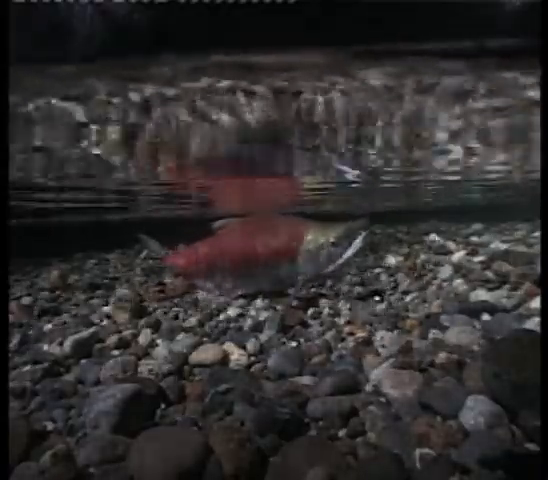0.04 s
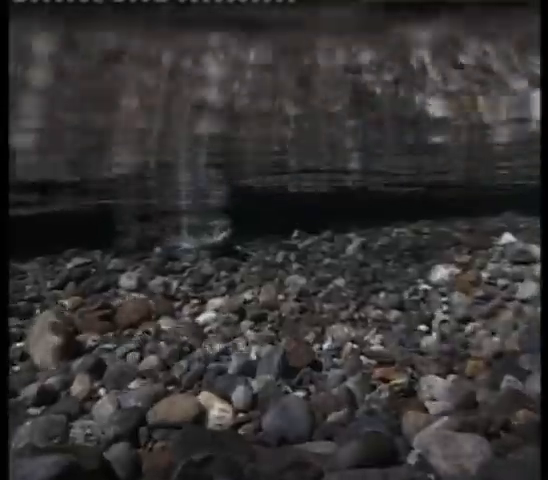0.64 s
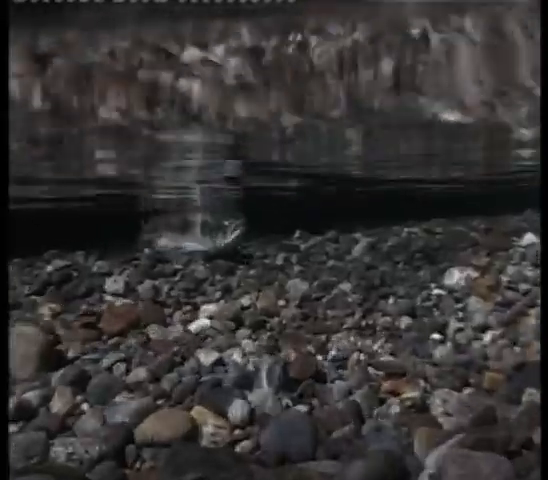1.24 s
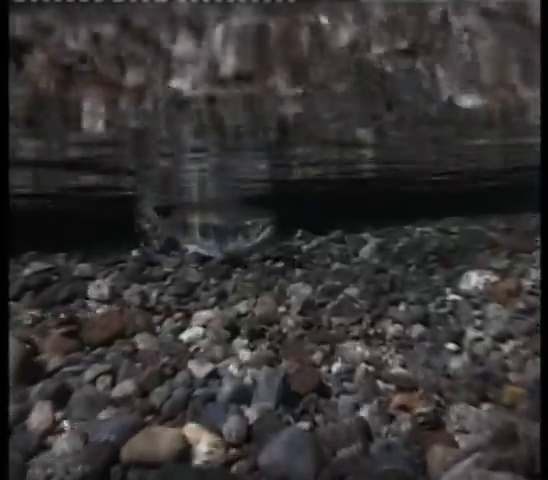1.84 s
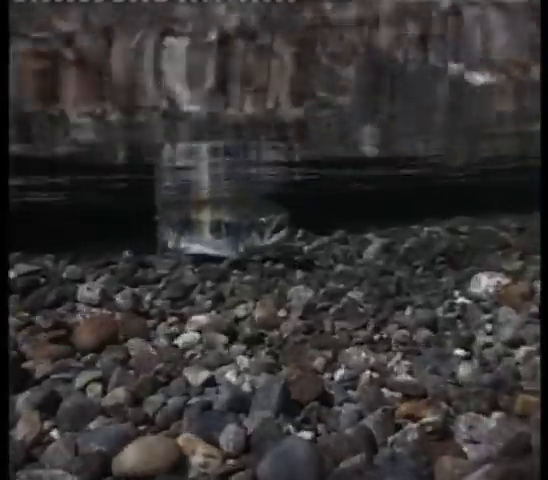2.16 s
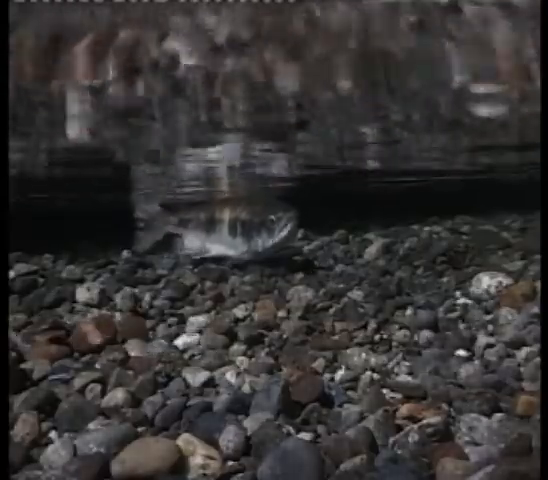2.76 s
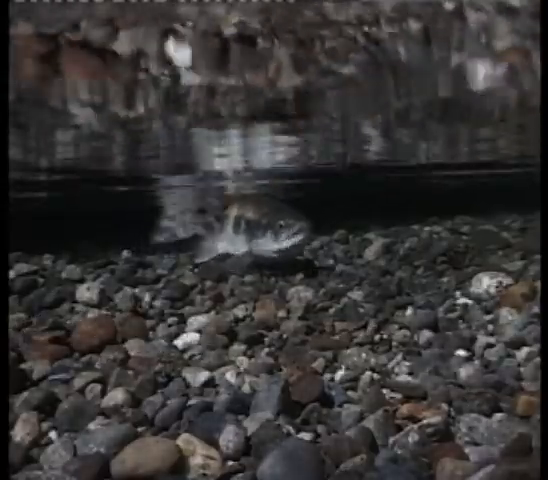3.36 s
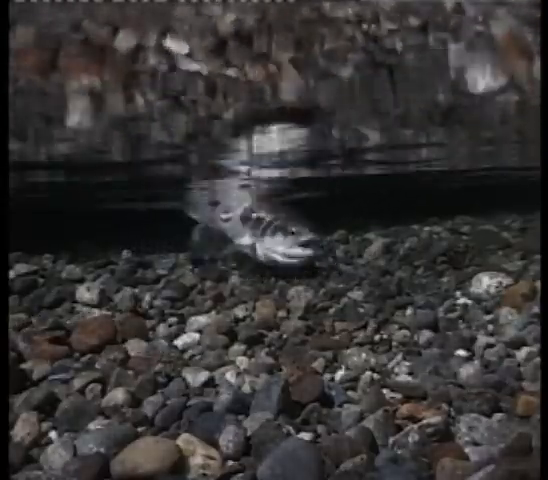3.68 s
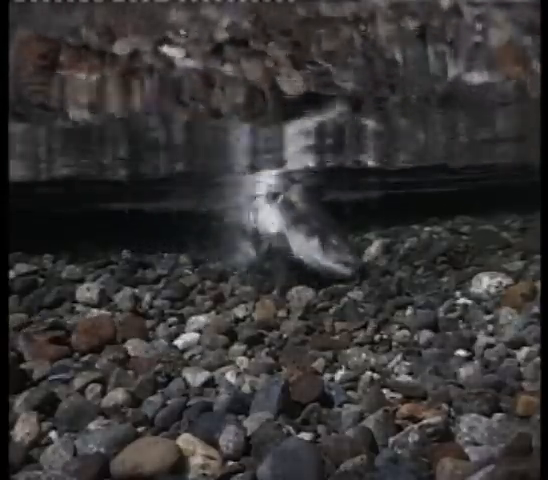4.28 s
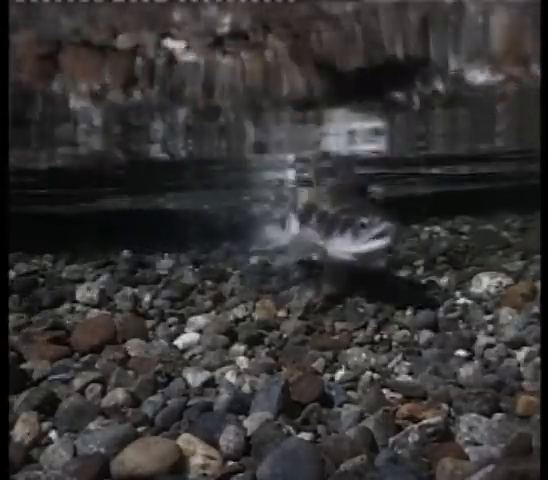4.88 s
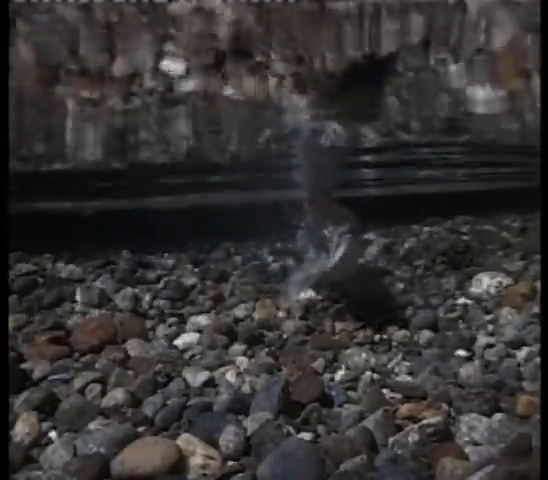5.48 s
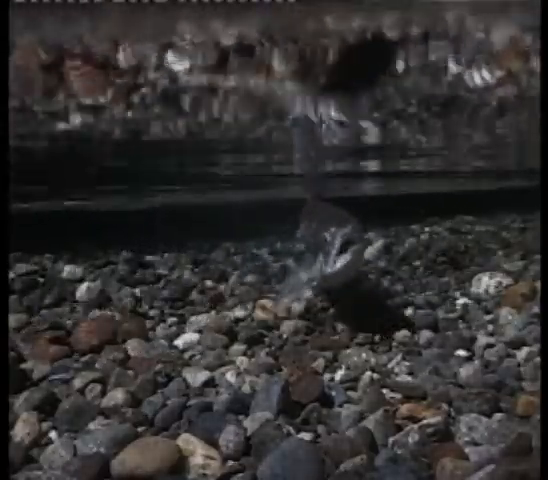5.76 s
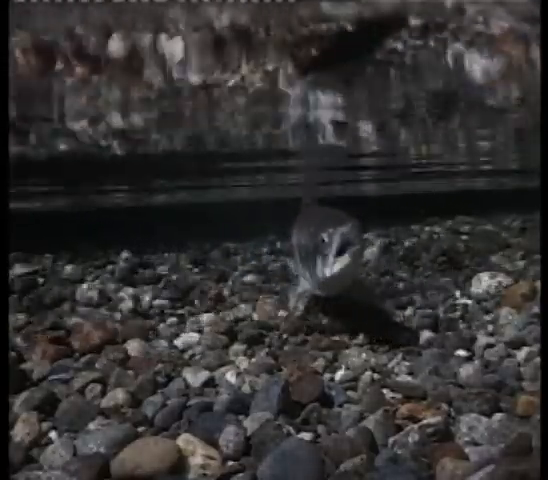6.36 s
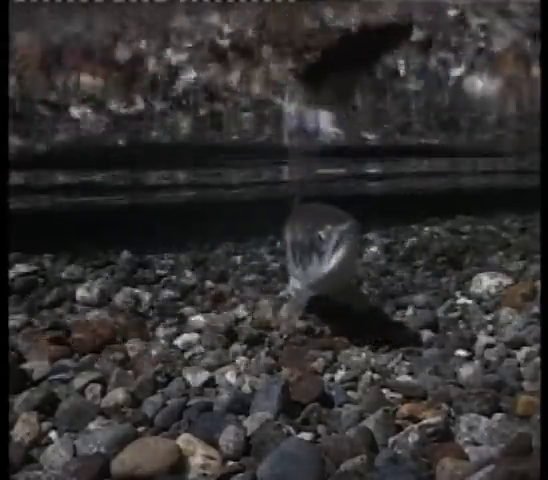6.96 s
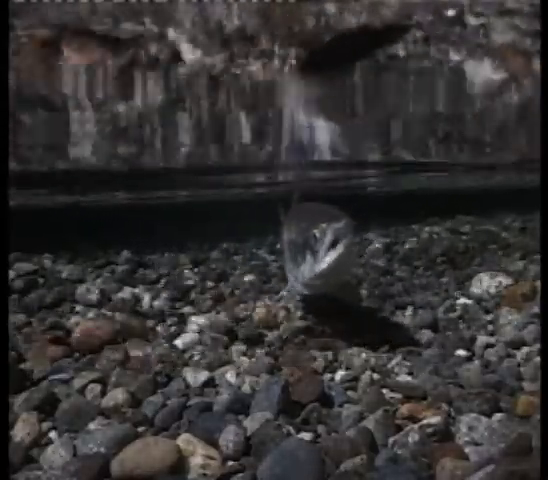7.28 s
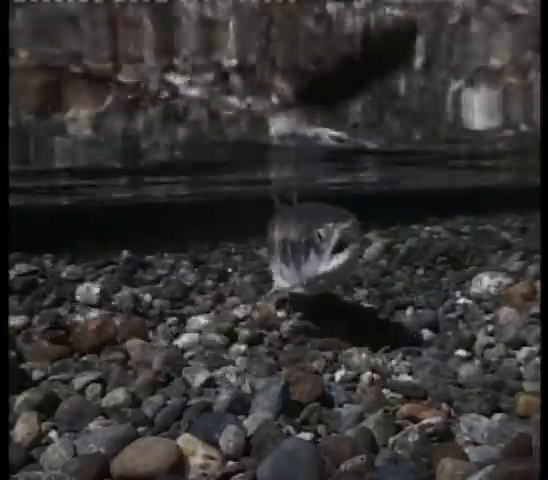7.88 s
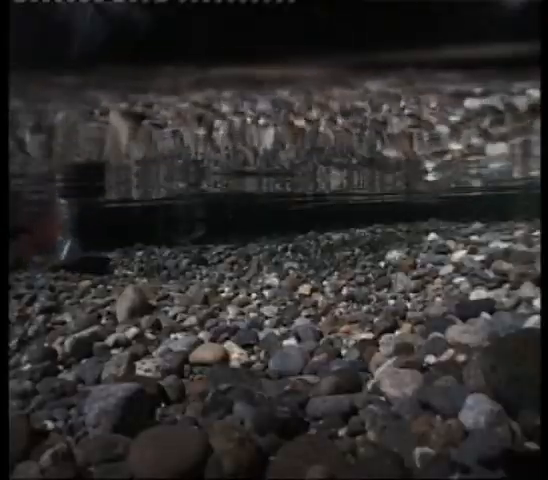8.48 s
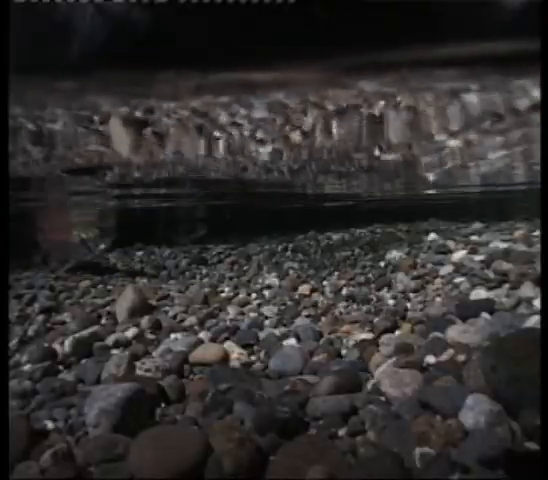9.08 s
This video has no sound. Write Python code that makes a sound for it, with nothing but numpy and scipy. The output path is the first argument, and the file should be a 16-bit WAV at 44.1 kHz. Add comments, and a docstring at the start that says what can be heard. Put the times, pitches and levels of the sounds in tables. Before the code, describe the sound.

At about 0.1 seconds a harsh digital glitch crackles, by far the loudest sound, and the signal goes dead until 0.3 seconds. A quiet, steady electrical buzz with a thin whistle and hiss then runs to the end, heard through two underwater microphones, the left much louder. A low, wavering hum joins from about 0.5 to 2.3 seconds. Between 1 and 2 seconds a fish lightly flicks its tail over gravel, with trickling grit and a few small pebble knocks. After a pause, from about 3.7 to 5.1 seconds, firm strokes come at roughly seven a second, rattling pebbles and rolling stones, with soft thumps and gulps of water. Bright knocks and clinks stand out, strongest around 4.5 seconds. The gravel settles with a last small knock near 5.6 seconds, leaving only buzz, whistle and hiss until about 9 seconds.

```python
"""Underwater over a gravel bed, through two microphones, the left much louder. A salmon beats its tail:
light flicks brush the grit, then firm strokes rattle pebbles, roll stones and push soft thumps of water
at the microphones. Single pebbles knock and clink. Behind the fish sit a steady electrical buzz, a
whistle and hiss, with a low hum in the first seconds. Just after the start a digital glitch crackles
loudly and the signal drops out for a moment."""
import sys
import numpy as np
from scipy import signal
from scipy.fft import rfft, irfft
from scipy.io import wavfile
from scipy.ndimage import uniform_filter1d

SR = 44100
rng = np.random.default_rng(int(sys.argv[2]) if len(sys.argv) > 2 else 0)


def put_to_file(sound):
    """Save the sound as 16-bit audio at rate SR, in the file named by the first command-line argument."""
    columns = np.atleast_2d(sound).T  # one column per channel
    safe = np.clip(columns, -1, 1)
    whole_steps = np.round(safe * 32767)
    wavfile.write(sys.argv[1], SR, whole_steps.astype(np.int16))


N = 402633
TIME = np.arange(N) / SR
FREQ = np.maximum(np.arange(N // 2 + 1) * SR / N, 1)

# Tail strokes digging into the bed, about seven a second: full_s, level_db
TAIL_STROKES = [(3.745, -70), (3.91, -63), (4.05, -60.5), (4.19, -58), (4.325, -59.5), (4.455, -54.5),
                (4.685, -55), (4.805, -58.5), (5.02, -64)]
FIRM_STROKE_DB, STROKE_HOLD_S = -55.5, 0.018


def digging(attack_s=0.053, slide_db=-5, stone_growth=1.16):
    """Each stroke rattles pebbles, leaves the bed sliding and rolls larger stones, which ring lower."""
    pebbles = level(shallows(contacts(per_s=1700, spread_db=5.5), decay_s=0.0022), 0.92)
    stones = shallows(contacts(per_s=600, spread_db=4.5), decay_s=0.0026)
    stones = level(colour(stones, [(2000, -3), (3200, 4), (4500, -17), (7000, -31)]), -57)
    push = beats(TAIL_STROKES, attack_s, STROKE_HOLD_S, release_s=0.047)
    slide = beats(TAIL_STROKES, attack_s, STROKE_HOLD_S, release_s=0.24)
    roll = beats(TAIL_STROKES, attack_s, STROKE_HOLD_S, release_s=0.12)
    rattling = pebbles * np.hypot(push, undb(slide_db) * slide)
    rolling = stones * (roll / undb(FIRM_STROKE_DB)) ** stone_growth
    return pan(rattling + rolling, left_db=4.5)


# Light flicks of the tail, just brushing the bed: full_s, level_db
TAIL_FLICKS = [(0.995, -65), (1.255, -59.5), (1.4, -62.5), (1.565, -58.5), (1.69, -63)]


def brushing():
    """Light flicks shift only fine grit, which keeps trickling while the fish hovers."""
    grit = shallows(contacts(per_s=900, spread_db=4.5), decay_s=0.00088)
    grit = level(colour(grit, [(2500, -12.5), (6000, -12), (8000, -9), (12000, -5)]), -1)
    flicks = beats(TAIL_FLICKS, attack_s=0.02, hold_s=0.015, release_s=0.045)
    trickle = undb(-74) * envelope(full_s=0.7, attack_s=0.15, hold_s=1.4, release_s=0.15)
    return pan(grit * np.hypot(flicks, trickle), left_db=5.5)


def contacts(per_s, spread_db):
    """Gravel touching gravel: dense tiny impacts, mostly small and a few large."""
    hits = rng.random(N) < per_s / SR
    signs = rng.choice([-1, 1], N)
    sizes = undb(spread_db * np.minimum(rng.exponential(size=N), 4))
    return level(hits * signs * sizes, 0)


# Ring of the gravel at the left and right microphones: pitch_hz, width_hz, gain_db
LEFT_MIC_MODES = [(2420, 180, 1), (2970, 230, -0.5), (3520, 280, 0), (4340, 350, -1), (5200, 330, 2),
                  (5900, 610, 1), (6140, 200, 7.5), (7800, 570, 0.5), (8200, 330, -5), (9000, 300, -8),
                  (9800, 360, -1), (11970, 2000, -2)]
RIGHT_MIC_MODES = [(2980, 390, -6), (3450, 600, -5.5), (4490, 900, -3), (5570, 400, 7.5), (7400, 900, -5),
                   (10550, 1900, -4.5), (11400, 500, -40)]


def shallows(force, decay_s):
    """Echoes between bed and surface smear each contact, which rings differently at each microphone."""
    energy = signal.lfilter([1], [1, -np.exp(-2 / (decay_s * SR))], force ** 2 + 1e-18)
    echoes = np.sqrt(energy) * rng.standard_normal((2, N))
    power = [sum(undb(2 * db) / (1 + 2 * ((FREQ - hz) / width) ** 2) ** 2 for hz, width, db in modes)
             for modes in (LEFT_MIC_MODES, RIGHT_MIC_MODES)]
    return irfft(rfft(echoes) * np.sqrt(power), N)


# Single pebbles knocking together, well to the left: start_s, strength_db
PEBBLE_KNOCKS = [(1.2221, -49), (1.3, -44.5), (1.5678, -47), (1.6866, -48), (1.709, -49), (2.0423, -47),
                 (3.7514, -43), (3.883, -42.5), (3.917, -49), (4.0125, -40.5), (4.0556, -41), (4.2043, -49),
                 (4.2646, -41), (4.3406, -35.5), (4.5392, -34.5), (4.7834, -34.5), (4.9062, -51),
                 (5.6047, -50)]
# Stones ringing as they settle, nearer the centre: start_s, pitch_hz, level_db
STONE_CLINKS = [(4.47, 5500, -48), (4.493, 5450, -45), (4.539, 9000, -44), (4.865, 8050, -57),
                (4.928, 3550, -53), (5.046, 3030, -48), (5.076, 6050, -55)]


def knocks(knock_gain_db=-4, knock_decay_s=0.002, clink_decay_s=0.003):
    """Larger pebbles meet with a short, bright chatter; a few settle with a clear clink."""
    force, clinks = np.zeros((2, N))
    t = TIME[:1024]
    attack = 1 - np.exp(-t / 0.0004)
    for start_s, db in PEBBLE_KNOCKS:
        add_at(force, start_s, undb(db + knock_gain_db) * attack * np.exp(-t / knock_decay_s))
    for start_s, hz, db in STONE_CLINKS:
        ringing = np.exp(-t / clink_decay_s) * np.sin(2 * np.pi * hz * t)
        add_at(clinks, start_s, undb(db) * attack * ringing)
    chatter = force * rng.standard_normal(N)
    chatter = colour(chatter, [(500, -18), (2500, 4), (6000, 1), (9000, 4.5), (12500, 2)])
    return pan(chatter, left_db=15) + pan(clinks, left_db=4)


# Soft knocks of water as the body turns: start_s, pitch_hz, level_db
WATER_GULPS = [(3.845, 417, -47.5), (3.875, 730, -56), (4.11, 466, -56), (4.39, 800, -50),
               (4.825, 764, -49)]


def wash(surge_db=-68.5, lead_s=0.034, growth=0.55):
    """Tail strokes push dull surges of water against the microphones, with a few soft gulps."""
    surge = ring(ring(rng.standard_normal(N), [(85, 53, 0)]), [(90, 75, 0)])
    # the water runs ahead of each stroke and grows with force more slowly than the rattle
    pushes = [(s - lead_s, surge_db + growth * (db - FIRM_STROKE_DB)) for s, db in TAIL_STROKES]
    flow = beats(pushes, attack_s=0.04, hold_s=STROKE_HOLD_S, release_s=0.05)
    gulps = np.zeros(N)
    t = TIME[:4096]
    for start_s, hz, db in WATER_GULPS:
        # a damped bubble of about four cycles, rising a little in pitch
        bubble = np.sin(2 * np.pi * hz * t * (1 + 2 * t)) * np.exp(-t * hz / 4)
        add_at(gulps, start_s, undb(db) * bubble)
    return pan(level(surge, 0) * flow + gulps, left_db=8)


# Spectrum of the fizz inside the glitch: frequency_hz, gain_db
FIZZ_SPECTRUM = [(30, -2), (120, -2.5), (280, -3), (700, 4.5), (1400, -5.5), (3200, 1.5), (9000, -1.5),
                 (13000, -6), (16000, -28.5)]


def glitch(start_s=0.099, end_s=0.134, spike_count=19, fizz_db=-20.5, hold_s=0.037, sag_db_per_s=91.5):
    """A harsh digital glitch: sharp spikes over a burst of fizz, different in each channel."""
    sag_db = sag_db_per_s * np.clip(TIME - start_s, 0, hold_s)
    burst = undb(fizz_db - sag_db) * envelope(start_s, attack_s=0.00035, hold_s=hold_s, release_s=0.0037)
    channels = []
    for _ in range(2):
        jitter, weakness, polarity = rng.random((3, spike_count))
        progress = (np.arange(spike_count) + jitter) / spike_count
        spike_db = np.interp((weakness + progress) / 2, [0.2, 0.9], [3.5, -5])  # early ones hit harder
        spikes = clicks(start_s + (end_s - start_s) * progress, np.sign(polarity - 0.5) * undb(spike_db))
        fizz = level(colour(rng.standard_normal(N), FIZZ_SPECTRUM), 0)
        channels.append(spikes + burst * fizz)
    return pan(np.array(channels), left_db=3)


# Irregular ticks within each buzz cycle: offset_ms, relative_db, until_s
CYCLE_TICKS = [(4.3, 0, 2.0), (5.4, 0, 2.0), (6.7, -6, 8), (9.05, -2, 9.2), (9.25, 0, 9.2), (10.2, -1, 9.2),
               (10.7, -2, 9.2), (11.7, -3, 9.2), (12.8, -5, 9.2), (13.2, -1, 9.2)]
# Spectra of the ticks and of their rasp: frequency_hz, gain_db
TICK_SPECTRUM = [(100, -14.5), (800, 2.5), (1500, 4), (2600, -6), (3250, -2.5), (4000, -2.5), (4800, -8),
                 (5650, -4), (6400, -4.5), (7300, -5.5), (8700, -10), (9650, -5), (10500, -11),
                 (13000, -11)]
RASP_SPECTRUM = [(300, -8), (1600, -1), (3300, -1), (5800, -5), (8000, -13), (13000, -15)]
BUZZ_HZ = 50.0015
BUZZ_PHASE = 2 * np.pi * BUZZ_HZ * (TIME - 0.0108)


def buzz(tick_rate_hz=805.5, tick_db=-64, rasp_db=-66.5, stray_gain_db=-1):
    """Electrical interference, mostly left: eight ticks a cycle plus strays, each with a spit of noise."""
    cycles = np.arange(int(N / SR * BUZZ_HZ) + 1) / BUZZ_HZ
    times = (cycles[:, None] + 0.00372 + np.arange(8) / tick_rate_hz).ravel()
    sizes = rng.uniform(1, 1.4, len(times))
    for offset_ms, db, until_s in CYCLE_TICKS:
        starts = cycles[cycles < until_s]
        times = np.append(times, starts + (offset_ms + rng.normal(0, 0.05, len(starts))) / 1000)
        sizes = np.append(sizes, undb(db + stray_gain_db) * rng.uniform(0.3, 1.4, len(starts)))
    # every tick swings down, then overshoots upward
    ticks = 0.7 * clicks(times + 0.00012, sizes) - clicks(times, sizes)
    spits = np.sqrt(np.abs(uniform_filter1d(ticks ** 2, size=36)))
    rasp = level(colour(spits * rng.standard_normal(N), RASP_SPECTRUM), rasp_db)
    return pan(level(colour(ticks, TICK_SPECTRUM), tick_db) + rasp, left_db=15.5)


# Harmonics in the ringing part of the buzz: harmonic_number, relative_db
TONE_HARMONICS = [(2, -18), (15, -46), (17, -43), (19, -4), (20, -1.5), (22, -14.5), (25, -33), (29, -17.5),
                  (32, -19)]
# Slow rise and fall of that ringing: time_s, strength_db
TONE_SWELL = [(0.35, -63.5), (1.08, -60), (2.23, -61), (2.25, -58.5), (4.42, -60.5), (6.54, -58.5),
              (8.07, -60), (8.2, -64.5), (9.1, -63)]


def buzz_tone(gain_db=-1):
    """High harmonics of the interference beat into a ringing tone that swells once a cycle."""
    tone = sum(undb(db) * np.sqrt(2) * np.cos(round(k) * BUZZ_PHASE) for k, db in TONE_HARMONICS)
    swell_db = np.interp(TIME, *np.transpose(TONE_SWELL))
    return pan(tone * undb(gain_db + swell_db), left_db=19)


def whine(whistle_hz=568.8, hum_hz=162, waver_hz=5):
    """A steady electrical whistle, and a wavering low hum with a rough octave in the first seconds."""
    whistle = level(np.sin(2 * np.pi * whistle_hz * TIME), -65.5)
    drift = level(uniform_filter1d(rng.standard_normal(N), size=2205), 0)
    hum = level(np.sin(2 * np.pi * np.cumsum(hum_hz + waver_hz * drift) / SR), -2.2)
    octave = level(ring(ring(rng.standard_normal(N), [(357, 130, 0)]), [(356, 150, 0)]), 2)
    swell = undb(-69.5) * envelope(full_s=0.6, attack_s=0.5, hold_s=1.68, release_s=0.1)
    return pan(whistle, left_db=17) + pan((hum + octave) * swell, left_db=8)


# Noise floor at both microphones: frequency_hz, gain_db
HISS_SPECTRUM = [(15, -21), (45, -4), (90, -5), (170, -5.5), (260, -5.5), (390, 1.5), (520, -6.5),
                 (800, -9.5), (1450, -10.5), (1700, -5.5), (2500, -15), (5000, -20.5), (8000, -22.5),
                 (13500, -29)]
# Hollow resonances in it: pitch_hz, width_hz, gain_db
HISS_MODES = [(997, 72, 9), (1166, 133, 2.5)]


def hiss(shared=0.35, throb_depth=0.19):
    """Even noise, partly common to both microphones; its hollow ring near 1 kHz follows the buzz."""
    left, independent = rng.standard_normal((2, N))
    noise = np.array([left, shared * left + np.sqrt(1 - shared ** 2) * independent])
    settling_db = np.interp(TIME, [0, 2, 2.6, 9], [0.75, 0.61, 0.31, 0.15])
    broad = level(colour(noise, HISS_SPECTRUM), -58.5) * undb(settling_db)
    hollow = level(ring(ring(noise, HISS_MODES), [(1060, 980, 0)]), -63.5)
    hollow *= 1 + throb_depth * np.cos(BUZZ_PHASE)
    swell_db = np.interp(TIME, *np.transpose(TONE_SWELL))
    hollow *= undb(0.5 * (swell_db - swell_db.mean()))
    return pan(broad, left_db=9.5) + pan(hollow, left_db=13.5)


def envelope(full_s, attack_s, hold_s, release_s):
    """Gain that swells to 1 at full_s, holds, then dies away."""
    early = np.maximum(full_s - TIME, 0) / attack_s
    late = np.maximum(TIME - full_s - hold_s, 0) / release_s
    return np.exp(-early - late)


def beats(rows, attack_s, hold_s, release_s):
    """Gain of a series of (full_s, level_db) tail beats of one shape, adding in power."""
    return np.sqrt(sum((undb(db) * envelope(s, attack_s, hold_s, release_s)) ** 2 for s, db in rows))


def clicks(times, sizes):
    """Band-limited impulses at exact times."""
    centres = np.clip(times * SR, 8, N - 10)[:, None]
    taps = centres.astype(int) + np.arange(-7, 9)
    shape = np.sinc(taps - centres) * np.cos(np.pi * (taps - centres) / 16) ** 2
    return np.bincount(taps.ravel(), (shape * sizes[:, None]).ravel(), N)


def add_at(track, start_s, sound):
    """Mix a short sound into a track."""
    start = int(start_s * SR)
    track[start:start + len(sound)] += sound


def colour(x, points):
    """Filter by a smooth spectrum of (frequency_hz, gain_db) points."""
    hz, db = np.transpose(points)
    return irfft(rfft(x) * undb(np.interp(np.log(FREQ), np.log(hz), db)), N)


def ring(x, modes):
    """Pass through parallel (pitch_hz, width_hz, gain_db) resonances."""
    response = sum(undb(db) / (1 + 1j * hz / width * (FREQ / hz - hz / FREQ)) for hz, width, db in modes)
    return irfft(rfft(x) * response, N)


def lowpass(x, hz):
    """Steep treble cut."""
    return signal.sosfilt(signal.ellip(10, 0.2, 70, hz, fs=SR, output="sos"), x)


def pan(x, left_db):
    """Place a sound, or a pair of sounds, with the left microphone louder by left_db."""
    ratio = undb(left_db)
    return x * np.array([[ratio], [1]]) * 2 / (1 + ratio)


def level(x, db):
    """Scale to an rms level."""
    return x * undb(db) / np.sqrt(np.mean(x ** 2))


def undb(db):
    """Decibels to gain."""
    return 10 ** (np.asarray(db) / 20)


def scene():
    """The fish on the gravel in front, the electrical background behind."""
    fish = brushing() + digging() + knocks() + wash()
    return fish + buzz() + buzz_tone() + whine() + hiss()


def record(dry, mic_top_hz=13550, top_hz=16000, dropout_s=(0.14, 0.2995)):
    """The microphones lose the top; the signal glitches up to full scale, then goes dead briefly."""
    live = (TIME < dropout_s[0]) | (TIME > dropout_s[1])
    microphones = lowpass(dry, mic_top_hz) * live
    return lowpass(np.clip(microphones + glitch(), -1, 1), top_hz)


dry = scene()
out = record(dry)
put_to_file(out)
```